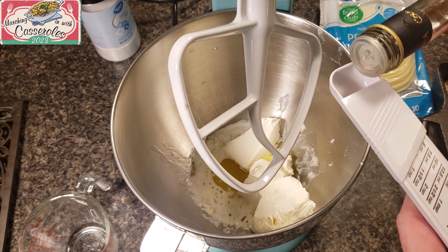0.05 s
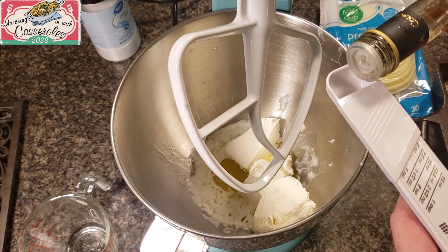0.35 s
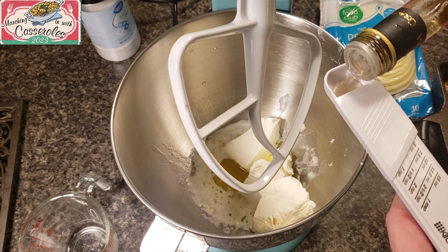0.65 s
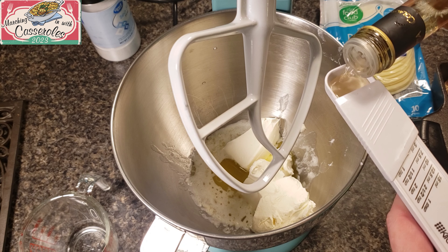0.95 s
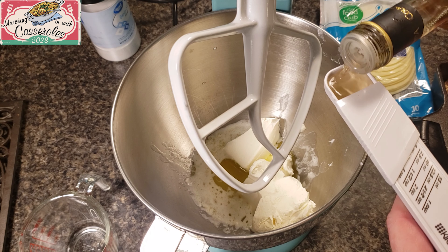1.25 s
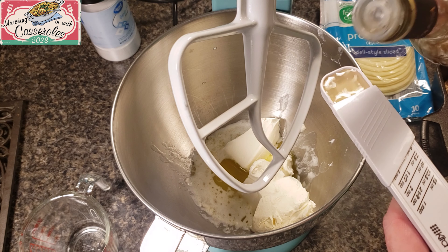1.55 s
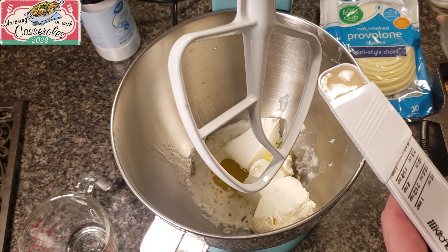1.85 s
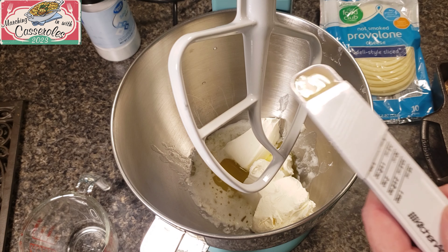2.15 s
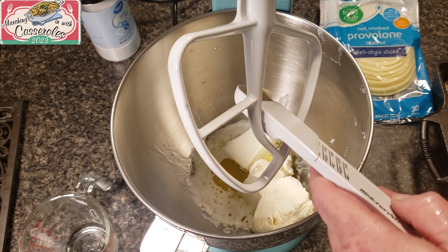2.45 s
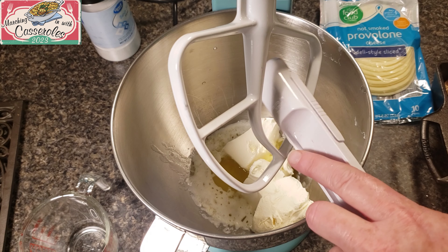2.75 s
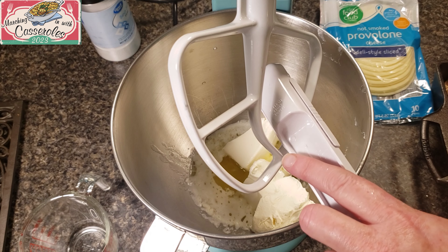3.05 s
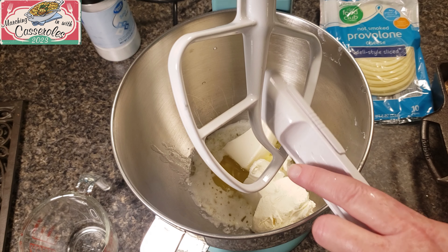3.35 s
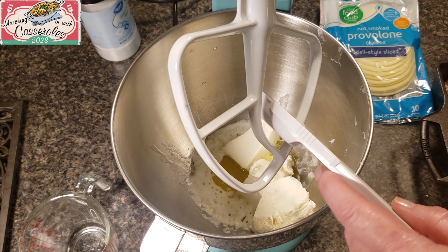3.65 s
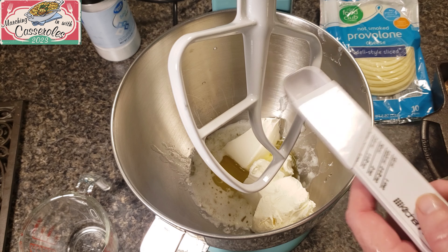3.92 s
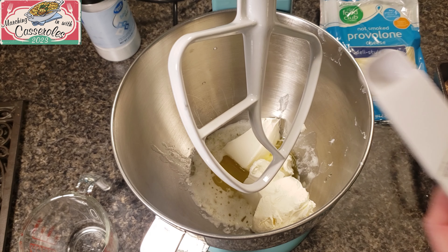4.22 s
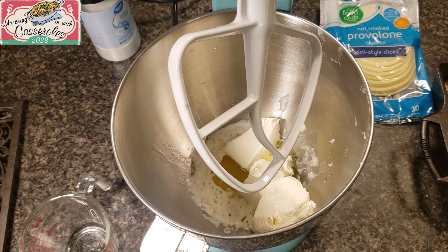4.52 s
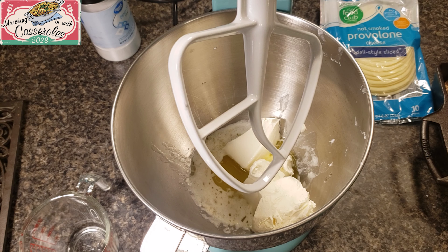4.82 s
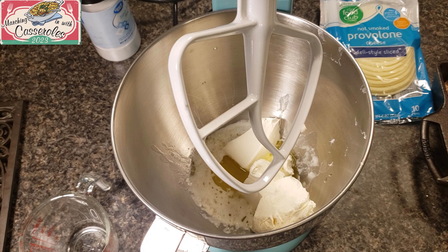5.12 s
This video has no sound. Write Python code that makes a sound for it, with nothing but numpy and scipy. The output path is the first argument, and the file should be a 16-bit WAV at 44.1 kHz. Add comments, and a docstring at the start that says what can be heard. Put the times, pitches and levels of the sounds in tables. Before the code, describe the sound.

In a small kitchen with a refrigerator humming softly, a glass bottle neck clinks lightly on a plastic measuring spoon and ticks faintly a few more times. The spoon then clacks against a stand mixer's beater and steel bowl, with tiny scrapes and thin squeaks, followed by two sharper taps. After a pause, the bottle lands on the counter with a loud, dull knock. The sounds are close, with a short room echo.

```python
"""Spoon, bottle and mixer bowl

A glass bottle neck clinks and ticks on a plastic measuring spoon. The spoon clacks, scrapes and squeaks on
the beater and steel bowl of a mixer, and the bottle lands on the counter with a heavy knock. Each impact
excites crowded resonances, heard as a crack or thud, and a few distinct modes that ring on. The small
kitchen reverberates, and a refrigerator hums and whines."""
import sys
import numpy as np
from scipy import signal
from scipy.fft import rfft, irfft
from scipy.io import wavfile
from scipy.ndimage import uniform_filter1d

SR = 44100
rng = np.random.default_rng(int(sys.argv[2]) if len(sys.argv) > 2 else 0)


def unload_wav(signal):
    """Save mono or channel-first audio to the path in sys.argv[1] as 16-bit WAV at rate SR, clipped to [-1, 1]."""
    wavfile.write(
        sys.argv[1],
        SR,
        np.round(np.clip(np.atleast_2d(signal).T, -1, 1) * 32767).astype(np.int16),
    )


N = 228432
T = np.arange(SR // 2) / SR  # time since a blow

# modes of spoon and beater: pitch_hz, level_db, t60_s
SPOON_MODES = [(754, -7, 0.067), (878, -4.5, 0.072), (1105, -1.5, 0.084), (1486, -17, 0.14),
               (1773, -7.5, 0.089), (1934, -12, 0.049), (2163, -8.5, 0.082), (2306, -3.5, 0.08),
               (3140, -13.5, 0.17), (3250, -13, .15), (3670, -14.5, 0.11), (4560, -9, 0.067),
               (5270, -7.5, 0.086), (5830, -13.5, .1), (7000, -14.5, 0.13), (12000, -8.5, .1)]


def spoon_taps():
    """Impact on beater or bowl: a softer contact gives more body, less treble and a weaker spot peak."""
    # blows of the spoon: start_s, level_db, softness_db, t60_s, ring_db, spot_hz
    taps = [(2.4840, -27, -2.5, 0.04, -12, 1690), (2.6087, -43, 10, 0.077, -2.5, 1150),
            (2.8203, -25, -2.5, 0.0064, -16, 2620), (2.8500, -32.5, -5.5, 0.0099, -22, 5280),
            (2.8606, -39, 9.5, 0.021, -16, 1480), (3.4410, -54.5, 15.5, 0.12, -2, 3060),
            (3.5282, -21, -2.5, 0.066, -2.5, 2090), (3.6642, -18, -1, 0.023, -8.5, 1740),
            (3.7606, -39.5, 6, 0.036, -18, 393), (3.8145, -38, 6, 0.043, -19, 4530)]
    return [(start, *clack(SPOON_MODES, db, body_db=soft_db, edge_db=-0.5 * soft_db, t60=t60,
                           ring_db=ring_db, spot_hz=spot_hz, spot_db=10 - 0.55 * soft_db))
            for start, db, soft_db, t60, ring_db, spot_hz in taps]


def neck_ticks():
    """Light impact of glass on plastic: little treble edge and a clear modal ring."""
    # touches of the bottle neck: start_s, level_db, body_db, t60_s, ring_db, spot_hz
    ticks = [(0.0560, -41, 3, 0.078, -1, 4500), (0.659, -62, 1.5, 0.071, 6, 5850),
             (1.1000, -79.5, 11, 0.13, -3, 1660), (1.2750, -71.5, -7, 0.4, -8, 5900),
             (1.401, -58.5, -12.5, 0.073, 2, 5850)]
    # modes of neck and spoon: pitch_hz, level_db, t60_s
    modes = [(1093, -5, 0.11), (1580, -13.5, 0.17), (3230, -42, 0.11), (3140, -23, .1), (4020, -22, .12),
             (4450, -38, 0.12), (5500, -20, 0.096), (6550, -18, .11)]
    return [(start, *clack(modes, db, body_db, edge_db=-8.5, t60=t60,
                           ring_db=ring_db, spot_hz=spot_hz, spot_db=9))
            for start, db, body_db, t60, ring_db, spot_hz in ticks]


def clack(modes, db, body_db, edge_db, t60, ring_db, spot_hz, spot_db):
    """Impulse response of plastic, as crack and ring: the struck spot favours resonances near spot_hz."""
    # spectrum of the plastic's crowded, quickly damped resonances: frequency_hz, density_db
    plastic = [(100, -21), (300, -5), (600, -2.5), (900, 0), (1400, -0.5), (2200, 0), (2800, 0), (4500, -2),
               (7000, 0), (9500, -7.5), (12000, 0), (16000, -9.5)]

    def emphasis_db(hz):
        shelves = read([(1700, body_db), (3200, 0), (7000, 0.0049), (9500, edge_db)], hz)
        spot = spot_db * np.exp(-(np.log((hz + 1) / spot_hz) / 0.11) ** 2)
        return shelves + spot

    def colour(hz):
        return unit(amp(read(plastic, hz))) * amp(emphasis_db(hz))

    mode_hz = np.array(modes)[:, 0]
    weights = amp(ring_db + emphasis_db(mode_hz) / 2 + rng.standard_normal(len(modes)))
    weights *= (-1) ** np.arange(len(modes))  # neighbouring modes swing in opposite directions
    crack = burst(colour, t60, apart_hz=2560) * rise(0.003)
    return amp(db) * crack, amp(db - 2.5) * ring(modes, weights, apart_hz=6926)


def bottle_knocks():
    """Heavy impact: each dull blow of the bottle sets the counter into free vibration."""
    # the bottle lands and rocks: start_s, level_db, treble_db, ring_db
    knocks = [(5.0232, -9, 0.5, -5.5), (5.0368, -20, 3.5, -11), (5.068, -39, 0, -17),
              (5.0770, -41, -3, -13), (5.1256, -23, -10.5, -20)]
    # spectrum of the blow: frequency_hz, density_db
    thud = [(30, -32), (80, -20), (150, -9.5), (250, 0), (400, 5), (650, -4), (1000, -7.5), (1500, -15),
            (2200, -18.5), (3000, -33), (5500, -42.5), (8500, -44), (12000, -58), (16000, -47)]
    # modes of counter and bottle: pitch_hz, level_db, t60_s
    modes = [(59, -28, 0.42), (114, -25.5, 0.83), (183.4, -22, 1), (204, -9, 0.29), (337.2, 0.5, 0.14),
             (375.7, -2.5, 0.14), (400, 9.5, 0.036), (444, -23, 0.2), (611, -14, .13), (629, -11.5, 0.17),
             (675, -26, 0.4), (864, -13.5, 0.12), (1000, -6.5, 0.084), (1184, -27, 0.27),
             (1290, -10.5, 0.078), (1830, -14.5, 0.055), (1950, -18, .1), (2280, -35, 0.062)]
    events = []
    for start, db, treble_db, ring_db in knocks:
        def colour(hz):
            return unit(amp(read(thud, hz))) * amp(read([(600, 0.0055), (2000, treble_db)], hz))

        blow = burst(colour, t60=0.066, apart_hz=1100) * rise(0.0066)
        ringing = ring(modes, np.ones(len(modes)), apart_hz=6000) * rise(0.022)
        events.append((start, amp(db - 2.0) * blow, -amp(db + ring_db + 3.5) * ringing))
    return events


def spoon_scrapes(count=8):
    """Sliding friction on the beater: an uneven run of small catches that weaken along the stroke."""
    # strokes: start_s, length_s, level_db, fade_db, body_db, spot_hz, spot_db
    scrapes = [(2.625, 0.026, -50, -3, 10.5, 1290, 4), (2.8260, 0.036, -39.5, -2, -3, 804, 17.5)]
    events = []
    for start, length, db, fade_db, body_db, spot_hz, spot_db in scrapes:
        for along in (np.arange(count) + 0.5 * rng.random(count)) / count:
            catch = clack(SPOON_MODES, db + fade_db * along, body_db, edge_db=-1.5, t60=0.034,
                          ring_db=-11.5, spot_hz=spot_hz, spot_db=spot_db)
            events.append((start + length * along, *catch))
    return events


def rim_slips():
    """Release of static friction: the spoon's rim sticks, then lets go with a thin, high click."""
    # releases: start_s, level_db
    slips = [(2.5990, -48.5), (2.658, -53.5), (2.767, -57.5), (2.7738, -60), (2.805, -51), (2.844, -42)]
    return [(start, *clack(SPOON_MODES, db, body_db=-6, edge_db=12, t60=0.016,
                           ring_db=-14, spot_hz=7000, spot_db=18))
            for start, db in slips]


def clink_and_squeaks(glide_s=0.0083):
    """Damped high tones: the bottle neck's bright clink, then two stick-slip squeaks of the spoon."""
    # short, sagging tones: start_s, first_hz, last_hz, level_db, t60_s, roughness_ratio
    tones = [(0.056, 4555, 4430, -36.5, 0.038, 0.0055), (2.7680, 7800, 6950, -48.5, 0.07, 0.035),
             (2.8500, 5606, 5014, -35.5, 0.13, 0.049)]
    track = np.zeros((2, N))
    for start, first_hz, last_hz, db, t60, roughness in tones:
        waver = unit(uniform_filter1d(rng.standard_normal(len(T)), size=20))
        glide_hz = last_hz + (first_hz - last_hz) * np.exp(-T / glide_s)
        phase = 2 * np.pi * np.cumsum(glide_hz * (1 + roughness * waver)) / SR
        tone = amp(db) * decay(t60) * rise(0.003) * np.sin(phase)
        add(track, start, np.array([tone, tone]))
    return track


def mixer_shakes():
    """Free vibration of a large mass: the mixer's stand answers hard blows with a slow, low wobble."""
    # shakes: start_s, level_db
    shakes = [(3.534, -48.5), (3.671, -42.5), (3.756, -46.5)]
    # modes of the stand: pitch_hz, level_db, t60_s
    modes = [(62, -14.5, 0.18), (92, -10.5, 0.17), (141.1, -10, 0.36), (183, 3.5, 0.2), (243, -5, 0.17),
             (350, 1.5, .12)]
    track = np.zeros((2, N))
    for start, db in shakes:
        signs = rng.choice([-1, 1], len(modes))
        add(track, start, amp(db) * ring(modes, signs, apart_hz=3000) * rise(0.034))
    return track


def kitchen(sound, build_s=0.003, echoes_per_s=6000):
    """Reverberation: dense reflections off counter, cupboards and walls decay at each band's own rate."""
    # reverberation times: frequency_hz, t60_s
    decay_times = [(120, .42), (350, 0.37), (900, 0.31), (2200, 0.27), (5500, 0.26), (10000, 0.21),
                   (15000, 0.28)]
    strengths = rng.standard_normal((2, len(T)))
    arrivals = rng.random((2, len(T))) < echoes_per_s / SR
    hz, t, bands = signal.stft(correlate(strengths * arrivals, diffuse), SR, nperseg=256)
    bands *= amp(-60 * t / read(decay_times, hz)[:, None])
    tail = signal.istft(bands, SR, nperseg=256)[1][:, :len(T)]
    tail *= 1 - np.exp(-(T / build_s) ** 2)
    return signal.fftconvolve(sound, tail / np.linalg.norm(tail[0]), axes=1)[:, :N]


def refrigerator_hum(air_db=-59.5, waver_db=1.0, drift_rad=0.35):
    """Line spectrum over broadband noise: wavering motor tones in the soft rush of a fan."""
    # motor tones: pitch_hz, level_db
    lines = [(59.2, -74), (161.5, -65.5), (177.6, -66), (236.9, -68.5), (317.6, -74.5), (355.3, -62),
             (473.7, -71.5), (532.9, -77), (651.4, -86), (710.6, -84)]
    # spectrum of fan air and microphone hiss: frequency_hz, density_db
    air_spectrum = [(20, -16), (55, -20.5), (85, -11.5), (165, -6.5), (330, -0.5), (480, -11.5), (700, -17),
                    (1100, -31), (1650, -31.5), (2300, -35.5), (6500, -41), (8800, -46), (12500, -33.5),
                    (16000, -37)]
    hz, t = np.fft.rfftfreq(N, 1 / SR), np.arange(N) / SR
    noise = correlate(rng.standard_normal((2, N)), diffuse)
    air = irfft(rfft(noise) * amp(read(air_spectrum, hz)), N)
    hum = amp(air_db) * unit(air)
    knots = np.linspace(0, t[-1], num=30)
    for line_hz, db in lines:
        swell, drift = (np.interp(t, knots, v) for v in rng.standard_normal((2, len(knots))))
        phase = 2 * np.pi * (line_hz * t + rng.random()) + drift_rad * drift
        lead = min(line_hz / 1500, 1) * np.array([[-1], [1]])
        hum += amp(db + waver_db * swell) * np.sqrt(2) * np.sin(phase + lead)
    return hum


def refrigerator_whine(pitch_hz=1602, flutter_depth=0.4, lead_rad=0.9):
    """Amplitude modulation: random flutter blurs a faint tone that swells and fades."""
    # envelope: time_s, level_db
    envelope = [(0, -80.5), (1.3, -81), (2.0, -84.5), (4.0, -81.5), (4.45, -77), (4.75, -88.5)]
    t = np.arange(N) / SR
    level = amp(np.interp(t, *np.transpose(envelope)))
    flutter = unit(uniform_filter1d(rng.standard_normal(N), size=400))
    tone = np.sqrt(2) * np.sin(2 * np.pi * pitch_hz * t + lead_rad * np.array([[-1], [1]]))
    return level * (1 + flutter_depth * flutter) * tone


def burst(colour, t60, apart_hz):
    """Modal overlap: crowded resonances merge into decaying noise; the channels differ above apart_hz."""
    size = len(T)
    envelope = decay(t60)
    noise = correlate(rng.standard_normal((2, size)), lambda hz: 1 / (1 + (hz / apart_hz) ** 2))
    spectrum = rfft(noise * envelope, 2 * size)
    # the blow feeds all bands evenly before the colour is applied
    spectrum /= np.sqrt(uniform_filter1d(abs(spectrum) ** 2, size=300, axis=1) / np.sum(envelope ** 2))
    log_gain = np.log(np.maximum(colour(np.fft.rfftfreq(2 * size, 1 / SR)), 1e-5))
    # minimum phase: nothing sounds ahead of the blow
    phase = -signal.hilbert(np.r_[log_gain, log_gain[-2:0:-1]]).imag[:size + 1]
    return irfft(spectrum * np.exp(log_gain + 1j * phase))[:, :size]


def ring(modes, weights, apart_hz):
    """Superposition of damped modes; the phase gap between channels grows with pitch up to apart_hz."""
    leads = np.minimum(np.array(modes)[:, 0] / apart_hz, 1)
    return sum(weight * amp(db) * decay(t60) * np.sin(2 * np.pi * hz * T + np.array([[lead], [-lead]]))
               for (hz, db, t60), weight, lead in zip(modes, weights, leads))


def placed(sound, left_db, left_late_s):
    """Direction cues: an off-centre source differs between the channels in level and arrival time."""
    delay = np.exp(-2j * np.pi * np.fft.rfftfreq(2 * N, 1 / SR) * left_late_s)
    left = irfft(rfft(sound[0], 2 * N) * delay)[:N]
    return np.array([left * amp(left_db / 2), sound[1] * amp(-left_db / 2)])


def diffuse(hz):
    """Diffuse-field coherence: how alike the channels are for sound arriving from all sides."""
    # left-right likeness: frequency_hz, coherence_ratio
    coherence = [(30, 0.39), (130, 0.93), (290, 0.8), (640, -0.39), (1400, -0.14), (3000, -0.1), (12000, 0)]
    return read(coherence, hz)


def correlate(noises, coherence):
    """Partial coherence: two independent noises are blended to a likeness of coherence(hz)."""
    size = noises.shape[1]
    left, other = rfft(noises)
    shared = np.clip(coherence(np.fft.rfftfreq(size, 1 / SR)), -1, 1)
    right = shared * left + np.sqrt(1 - shared ** 2) * other
    return irfft(np.array([left, right]), size)


def decay(t60):
    """Exponential damping: 60 dB down after t60 seconds."""
    return amp(-60 * T / t60)


def rise(settle_s):
    """Exponential build-up from silence."""
    return 1 - decay(settle_s)


def amp(db):
    """Decibels to amplitude ratio."""
    return 10 ** (np.asarray(db) / 20)


def unit(x):
    """Normalisation to rms 1."""
    return x / np.sqrt(np.mean(x ** 2) + 1e-20)


def read(points, hz):
    """Interpolation along a log-frequency axis."""
    point_hz, value = np.transpose(points)
    return np.interp(np.log(hz + 1), np.log(point_hz + 1), value)


def add(track, start, sound):
    """Superposition of a stereo sound on a track, from start seconds on."""
    part = track[:, round(start * SR):][:, :sound.shape[1]]
    part += sound[:, :part.shape[1]]


def played(events):
    """Superposition of (start_s, crack, ring) events into a track of cracks and one of rings."""
    cracks, rings = np.zeros((2, 2, N))
    for start, crack, ringing in events:
        add(cracks, start, crack)
        add(rings, start, ringing)
    return cracks, rings


def scene():
    """Direct and reverberant sound of spoon, mixer and bottle add to the refrigerator's drone."""
    cracks, rings = played(neck_ticks() + spoon_taps() + rim_slips() + spoon_scrapes())
    blows, counter = played(bottle_knocks())
    rings += mixer_shakes()
    cracks += clink_and_squeaks()
    spoon = placed(cracks + rings, left_db=1.5, left_late_s=0)
    bottle = placed(blows + counter, left_db=0.1, left_late_s=0.00021)
    # sharp onsets excite the room most; the ringing is heard mainly from close by
    room = kitchen(amp(-4.0) * cracks + amp(-2.5) * blows + amp(-19.0) * (rings + counter))
    return spoon + bottle + room + refrigerator_hum() + refrigerator_whine()


def record(dry, cutoff_hz=16100):
    """Frequency response: two slightly unequal microphone ports, then a low-pass band limit."""
    # extra sensitivity of the left port over the right: frequency_hz, gain_db
    imbalance = [(100, 0.6), (350, 1.5), (800, 3), (5000, 2.5), (8000, 5), (13000, -1.3)]
    left_db = read(imbalance, np.fft.rfftfreq(2 * N, 1 / SR))
    ports = irfft(rfft(dry, 2 * N) * amp([left_db / 2, -left_db / 2]))[:, :N]
    lowpass = signal.firwin(255, cutoff_hz, window=("kaiser", 9), fs=SR)
    return signal.oaconvolve(ports, lowpass[None], "same", axes=1)


dry = scene()
out = record(dry)
unload_wav(out)
```